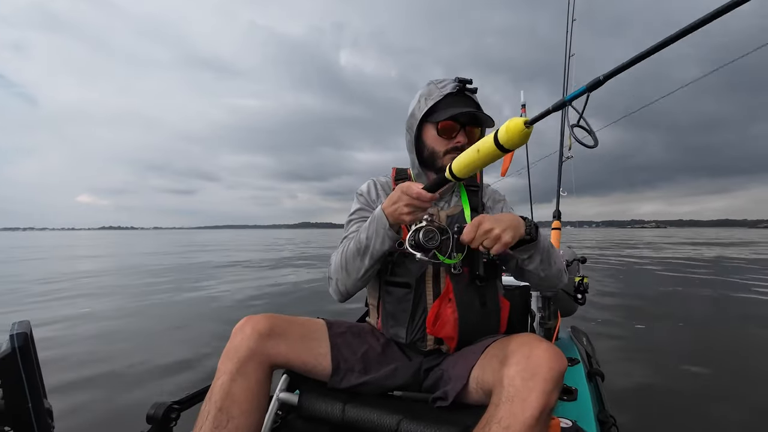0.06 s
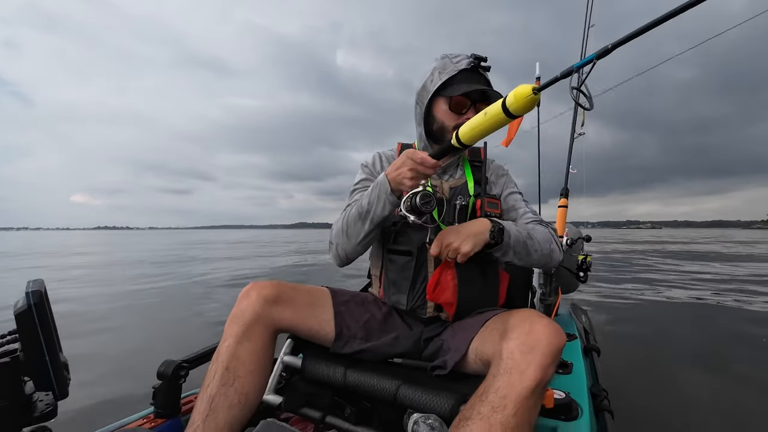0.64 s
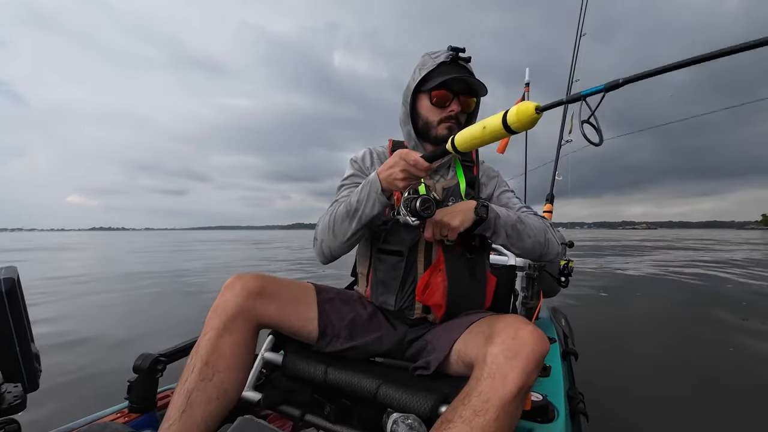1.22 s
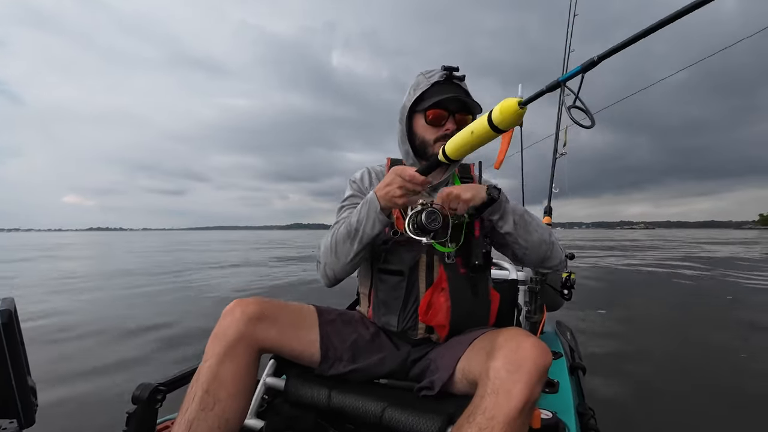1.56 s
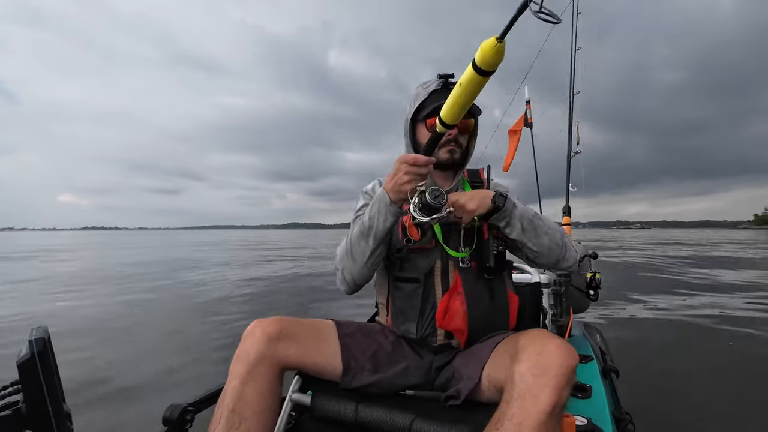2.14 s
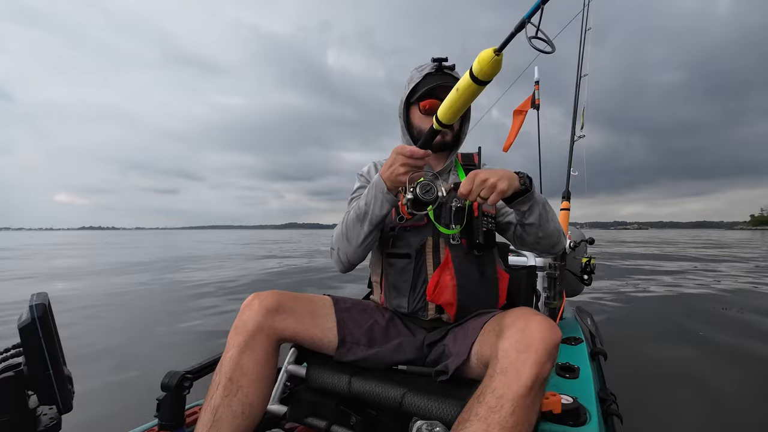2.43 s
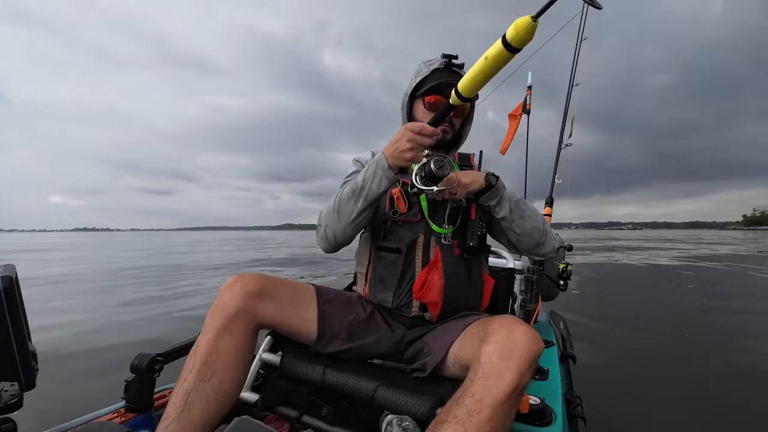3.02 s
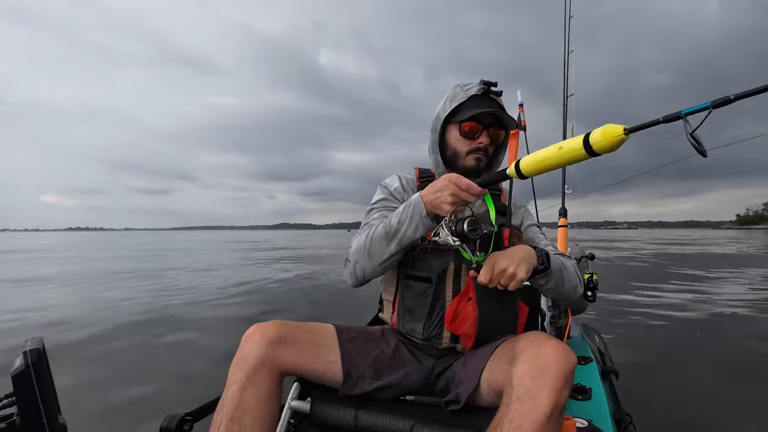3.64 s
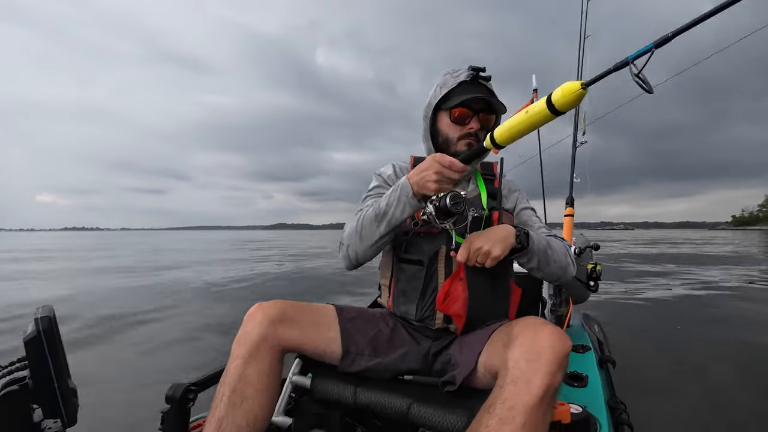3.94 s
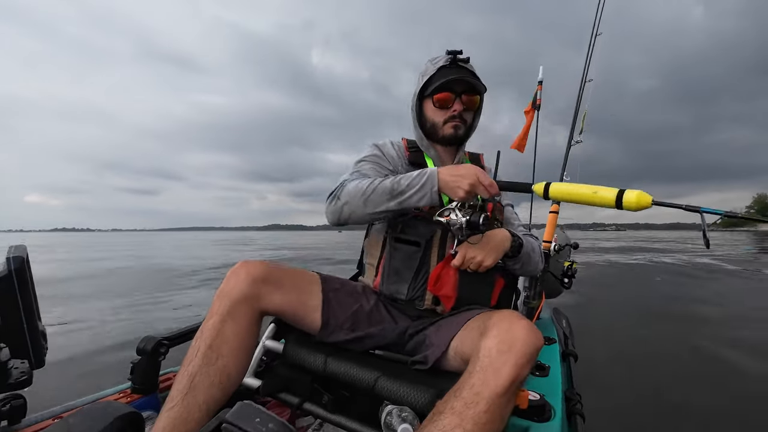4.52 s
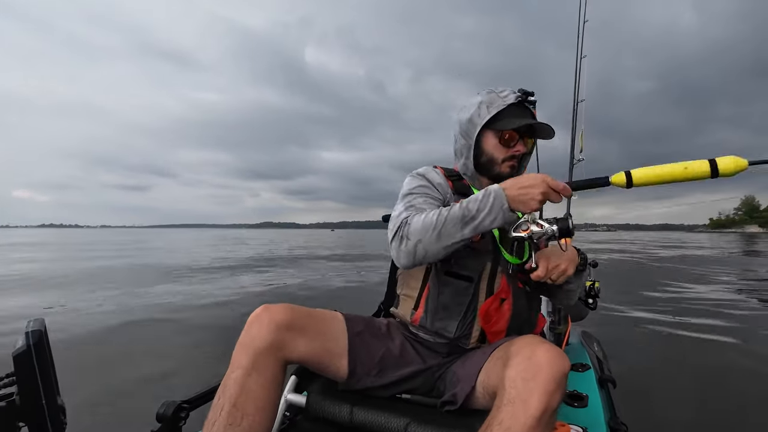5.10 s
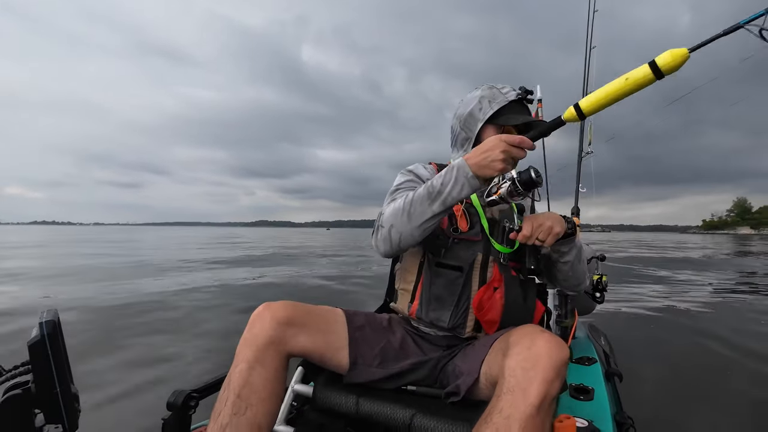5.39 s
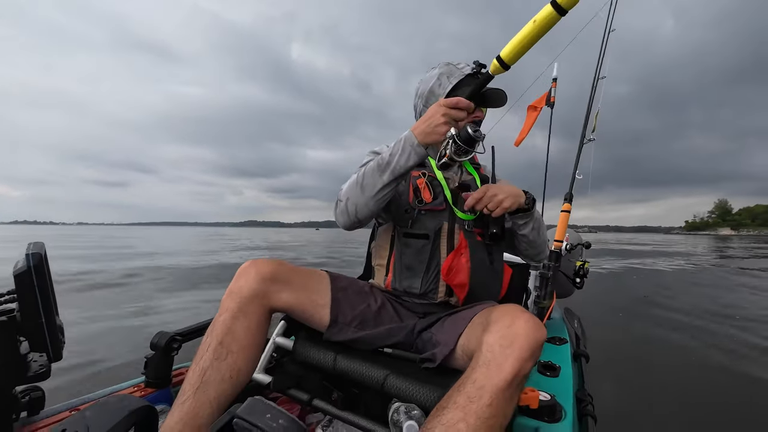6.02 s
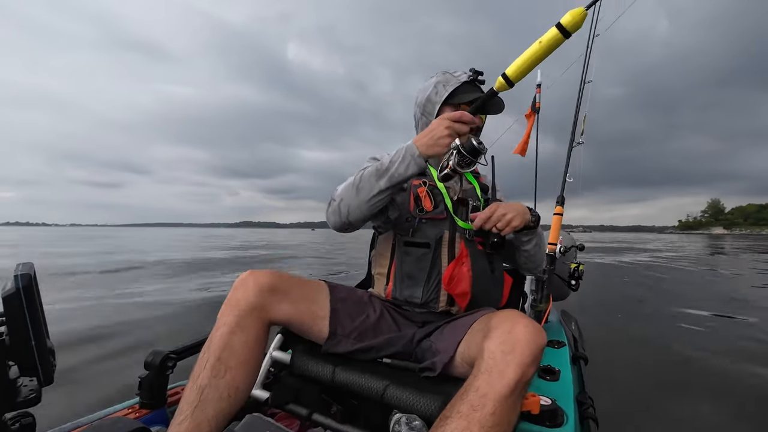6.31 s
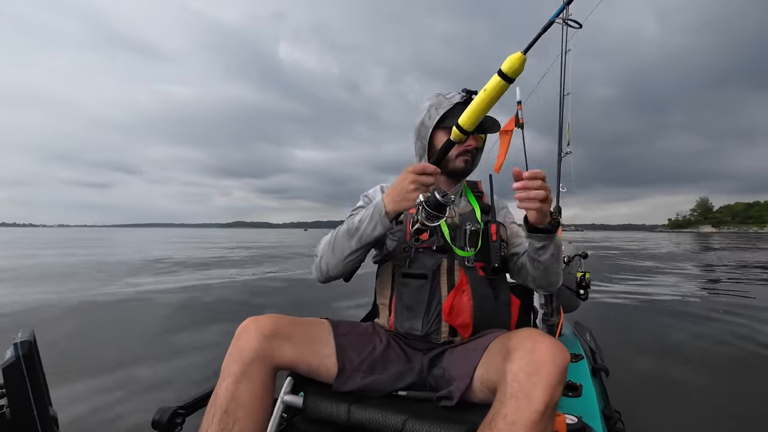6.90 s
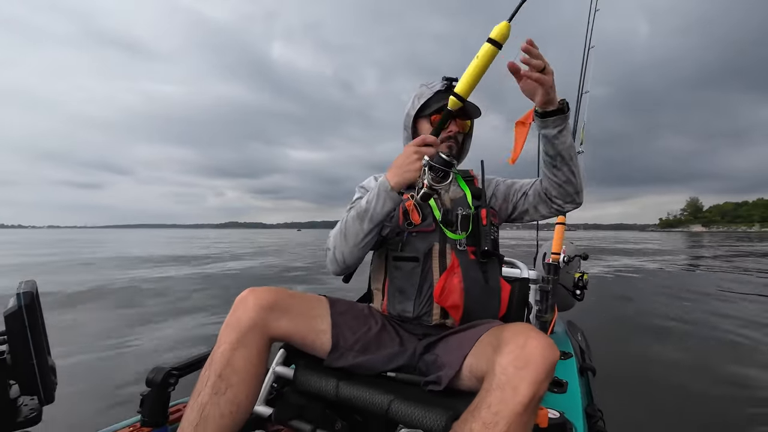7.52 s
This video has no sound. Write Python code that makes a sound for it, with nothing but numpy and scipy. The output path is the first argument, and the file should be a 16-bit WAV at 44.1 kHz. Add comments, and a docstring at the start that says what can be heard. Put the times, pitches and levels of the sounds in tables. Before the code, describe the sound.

A fishing reel whirs and ticks in short spurts, then a fish splashes at the surface, with wind rumbling on the microphone.

```python
"""Reeling in a fish from a kayak

A spinning reel is cranked in short spurts: meshing gears whine up and down, the rotor rasps, bail and
line tick. The hooked fish thrashes at the surface in two bouts of slaps, bubbles and spray; the tackle
clacks. Wind buffets the microphone over a wash of open water, hull slop, a low hum and faint birds."""
import sys
import numpy as np
from scipy import signal
from scipy.fft import rfft, irfft, next_fast_len
from scipy.io import wavfile
from scipy.ndimage import uniform_filter1d

SR = 44100
rng = np.random.default_rng(int(sys.argv[2]) if len(sys.argv) > 2 else 0)


def int16_out(signal):
    """Quantize to a 16-bit WAV file."""
    q = np.round(np.clip(np.atleast_2d(signal).T, -1, 1) * 32767)
    wavfile.write(sys.argv[1], SR, q.astype(np.int16))


N = 341762
T = np.arange(N) / SR

# impact spectrum, water slaps and tackle clack: f/Hz, gain/dB
IMPACT_EQ = [(500, -22), (900, -8), (1400, 9), (2000, 4.5), (3200, 8.5), (4500, 3.5), (7000, 0),
             (16000, -18)]
# bright spectrum, spray and tackle clack: f/Hz, gain/dB
MIST_EQ = [(2000, -2), (4500, -4.5), (7000, -5.5), (9000, -6.5), (11000, 1.5), (16000, -11)]


def amp(db):
    """dB to gain."""
    return 10 ** (np.asarray(db) / 20)


def unit(x):
    """Scale to rms 1."""
    return x / np.sqrt(np.mean(x ** 2) + 1e-20)


def curve(rows):
    """Breakpoints (t/s, value) to a per-sample curve."""
    return np.interp(T, *np.transpose(rows))


def eq_db(eq, hz):
    """Gain of a spectrum at hz, interpolated over log frequency."""
    f, db = np.transpose(eq)
    return np.interp(np.log(hz + 1), np.log(f + 1), db)


def colour(x, eq):
    """Filter by a spectrum; rms 1."""
    size = next_fast_len(len(x))
    gain = amp(eq_db(eq, np.fft.rfftfreq(size, 1 / SR)))
    return unit(irfft(rfft(x, size) * gain, size)[:len(x)])


def noise(size=N):
    """White noise."""
    return rng.standard_normal(size)


def wander(hz):
    """Random drift, low-passed at hz; rms 1."""
    slow = signal.sosfilt(signal.butter(2, hz, fs=SR / 10, output="sos"), noise(N // 10 + 1))
    return unit(np.interp(T, T[::10], slow[:len(T[::10])]))


def ring(x, hz, width_hz):
    """Resonator, peak gain 1."""
    return signal.lfilter(*signal.iirpeak(hz, hz / width_hz, SR), x)


def add(mix, at_s, sound):
    """Mix a sound in at at_s."""
    part = mix[max(round(at_s * SR), 0):][:len(sound)]
    part += sound[:len(part)]


def burst(eq, t60_s, rise_s=0.00028):
    """Coloured noise, fast rise, exponential decay; peak 1."""
    t = T[:SR // 5]
    puff = colour(noise(len(t)), eq) * (1 - np.exp(-t / rise_s)) * amp(-60 * t / t60_s)
    return puff / abs(puff).max()


def grains(per_s, spread_db):
    """Sparse clicks of uneven size."""
    when, tail, polarity = rng.random((int(per_s * N / SR), 3)).T
    size = amp(spread_db * np.minimum(-np.log(tail), 4)) * (2 * polarity - 1)
    return np.bincount((when * N).astype(int), size, N)


def birds():
    """Thin gliding whistles from the shore."""
    # whistles: t/s, length/s, start f/Hz, end f/Hz, level/dB
    whistles = [(.37, 0.17, 5300, 5050, -76), (1.09, .13, 6400, 6850, -80), (6.845, 0.18, 6400, 6550, -79),
                (7.002, 0.2, 4200, 4300, -76)]
    out = np.zeros(N)
    for at_s, length_s, from_hz, to_hz, db in whistles:
        hz = np.linspace(from_hz, to_hz, int(length_s * SR))
        add(out, at_s, amp(db) * np.hanning(len(hz)) * np.sin(2 * np.pi * np.cumsum(hz) / SR))
    return out


def lake():
    """Open-water wash, a low hum, and a faint steady hiss that swells briefly near 5 s."""
    # wash envelope: t/s, level/dB
    wash_levels = [(0, -61), (.5, -59.5), (1.1, -60), (3.05, -61), (4.1, -60.5), (4.6, -60.5), (5.2, -60),
                   (6.6, -61), (7.75, -58.5)]
    # wash spectrum: f/Hz, gain/dB
    wash_eq = [(180, -19), (300, -4), (354, -3.5), (689, -11.5), (900, -18), (1060, -18.5), (2790, -42.5),
               (3460, -41.5), (3830, -61), (5340, -36), (16000, -71)]
    # hum tones: f/Hz, width/Hz, level/dB
    hum_tones = [(243.9, 6.9, -55.5), (212.5, 11.8, -57)]
    # background hiss envelope, end values held: t/s, level/dB
    hiss_levels = [(4.3, -65.5), (4.55, -63.5), (4.78, -63), (4.93, -57.5), (5.03, -58), (5.1, -65.5),
                   (5.2, -66)]
    # hiss spectrum: f/Hz, gain/dB
    hiss_eq = [(600, 3.5), (1400, 1), (2800, -5.5), (4500, -11.5), (7000, -14.5), (11000, -19),
               (16000, -27)]
    wash = amp(curve(wash_levels) + 0.7 * wander(15)) * colour(noise(), wash_eq)
    hum = np.zeros(N)
    for hz, width_hz, db in hum_tones:
        peak = np.sqrt(2) * amp(db + 2 * wander(width_hz))
        drifting_hz = hz + width_hz / 2 * wander(width_hz)
        hum += peak * np.sin(2 * np.pi * np.cumsum(drifting_hz) / SR)
    hiss = amp(curve(hiss_levels)) * colour(noise() + 0.45 * unit(grains(300, 3.1)), hiss_eq)
    return wash + hum + hiss


def hull():
    """Wavelets slop against the kayak."""
    # slops: t/s, peak/dB, t60/s
    slops = [(.665, -42, 0.053), (.776, -39, 0.03), (.864, -40, 0.11), (0.896, -42, .08),
             (3.83, -43.5, 0.21), (4.738, -32, 0.045), (6.06, -52, 0.054), (7.677, -37, 0.04)]
    # slop spectrum: f/Hz, gain/dB
    slop_eq = [(20, -46), (150, -6), (300, 1.5), (430, 10.5), (600, -16), (1200, -33), (2500, -29),
               (16000, -88)]
    out = np.zeros(N)
    for at_s, db, t60_s in slops:
        add(out, at_s, amp(db) * burst(slop_eq, t60_s, rise_s=0.00061))
    return out


def eddies(eq, span_s):
    """Turbulence, levelled over span_s so that the gusts shape its swells."""
    x = colour(noise(), eq)
    return x / np.sqrt(uniform_filter1d(x ** 2, int(span_s * SR)) + 0.11)


def wind(rumble_db=0.75, thump_db=-1, flutter_db=-46, breeze_db=-35, flutter_db_per_db=0.29):
    """Wind on the microphone: rumble and flutter follow its strength; buffets and thumps stand out."""
    # wind strength: t/s, level/dB
    strength = [(0.0, -32.5), (0.2, -40), (0.8, -41), (0.9, -32), (1.3, -33.5), (1.5, -39), (1.6, -33.0),
                (1.7, -39.5), (2.0, -39.5), (2.45, -30), (2.55, -41.5), (2.65, -28.0), (3.55, -44),
                (4.15, -39.0), (4.5, -27.5), (5.3, -37.0), (5.7, -30.5), (5.85, -44), (5.95, -29),
                (6.4, -28.0), (6.7, -35.5), (6.8, -30), (7.45, -23.5), (7.75, -32)]
    # rumble spectrum: f/Hz, gain/dB
    rumble_eq = [(8, -19.5), (22, 3), (40, 0.5), (65, -2.5), (90, -7.5), (120, -17), (200, -42),
                 (2000, -140)]
    # flutter spectrum: f/Hz, gain/dB
    flutter_eq = [(50, -8.5), (85, -2.5), (115, 4), (160, -6), (210, -10), (300, -19.5), (450, -38.5),
                  (800, -45.5), (8000, -130)]
    # buffets: t/s, length/s, level/dB
    buffets = [(0.915, .1, -39), (2.336, 0.063, -31.5), (2.978, .06, -38), (4.54, 0.059, -34),
               (4.76, 0.059, -25.5), (4.954, 0.11, -36), (5.7, .1, -38), (5.973, .08, -32),
               (6.09, 0.059, -27), (6.215, 0.15, -28.5), (6.386, 0.19, -29), (6.522, 0.039, -34),
               (6.81, 0.15, -37), (7.177, 0.11, -32), (7.263, 0.071, -29), (7.389, .17, -30)]
    # dull thumps: t/s, level/dB, f/Hz, length/s
    thumps = [(2.688, -23.5, 148, 0.017), (4.735, -25, 327.9, 0.01), (4.745, -11.5, 92, 0.028),
              (4.763, -15.5, 147, 0.022), (6.198, -14.5, 132, 0.0206), (6.365, -16, 104.6, 0.041)]
    strength_db = curve(strength)
    flutter_gain = amp(flutter_db + flutter_db_per_db * (strength_db - breeze_db) + 2 * wander(10))
    for at_s, length_s, db in buffets:
        buffet = amp(db) * np.exp(-(2 * (T - at_s) / length_s) ** 2)
        flutter_gain = np.maximum(flutter_gain, buffet)
    rumble_gain = amp(strength_db + rumble_db + 0.9 * wander(6))
    out = rumble_gain * eddies(rumble_eq, 0.114) + flutter_gain * eddies(flutter_eq, 0.099)
    for at_s, db, hz, length_s in thumps:
        t = T[:int(length_s * SR)]
        window = np.sin(np.pi * t / length_s) ** 2
        add(out, at_s, -amp(db + thump_db) * np.sin(2 * np.pi * hz * t) * window)
    return out


def tackle(ring_db=10, clack_s=7.52, clack_db=-26, crack_db=-2):
    """Bright ticks of bail and line; one hard clack of damped modes and noise."""
    # ticks: t/s, peak/dB, resonance f/Hz
    ticks = [(0.3186, -34.5, 15300), (0.6719, -44, 6170), (1.679, -45.5, 6090), (1.9624, -36, 6130),
             (2.0029, -38, 6980), (2.0663, -47, 8160), (2.1728, -37, 6100), (2.2458, -44.5, 6020),
             (2.7044, -51, 8160), (2.7396, -41, 6020), (2.9634, -36.5, 9560), (3.3767, -46, 6200),
             (3.6376, -45.5, 9660), (3.7868, -53, 7540), (4.2704, -48, 7500), (4.599, -49, 6950),
             (5.5613, -49, 7490), (5.6335, -43.5, 7570), (5.829, -44, 9150), (6.643, -45, 6030),
             (6.6993, -42.5, 9500)]
    # tick spectrum: f/Hz, gain/dB
    tick_eq = [(1000, -22), (3000, -10), (5500, -3.5), (8500, -10.5), (11500, -1.5), (13500, -6),
               (15200, -5), (17000, 0)]
    # clack modes: f/Hz, gain/dB, t60/s
    clack_modes = [(1140, -9, 0.013), (1550, -11, 0.031), (2870, -0.5, 0.013), (3300, -0.5, 0.012),
                   (3500, 4.5, 0.015), (3770, -6, 0.014), (5500, -11, 0.013), (6130, -9, 0.032),
                   (8400, -25, .02)]
    out, t = np.zeros(N), T[:SR // 10]
    for at_s, db, hz in ticks:
        tick = burst(tick_eq, t60_s=0.026, rise_s=0.0001)
        tick += amp(ring_db) * ring(tick, hz, width_hz=1500)
        add(out, at_s, amp(db) * tick / abs(tick).max())
    modes = sum(amp(db - 60 * t / t60_s) * np.sin(2 * np.pi * (hz * t + rng.random()))
                for hz, db, t60_s in clack_modes)
    crack = burst(IMPACT_EQ, t60_s=0.011) + 0.93 * burst(MIST_EQ, t60_s=0.044)
    add(out, clack_s, amp(clack_db) * modes)
    add(out, clack_s, amp(clack_db + crack_db) * crack)
    return out


def bubble(hz, cycles, glide=0.018):
    """A trapped bubble rings, rising in pitch near the surface; decays to 1/e in `cycles`."""
    age = T[:SR // 25] * hz / cycles
    phase = 2 * np.pi * cycles * age * (1 + glide * age / 2)
    return np.sin(phase) * np.exp(-age) * (1 - np.exp(-10 * age))


def bubbling(lo_hz, hi_hz, per_s, spread_db, cycles):
    """Bubble cloud: 20 sizes, per_s of each; rms 1."""
    return unit(sum(signal.oaconvolve(grains(per_s, spread_db), bubble(hz, cycles))[:N]
                    for hz in np.geomspace(lo_hz, hi_hz, num=20)))


def churn(rise_s=0.024, t60_s=0.31, patter_db=-16, patter_t60_s=8):
    """Churned water gurgles and fizzes; each surge swells, holds, collapses to a patter of spray."""
    # surges: t/s, hold/s, gurgle level/dB, fizz level/dB
    surges = [(5.913, 0.12, -48.5, -52.5), (6.193, .06, -51, -54), (6.358, 0.062, -61.5, -61.5),
              (7.241, 0.018, -50.5, -48.5), (7.321, 0.34, -59.5, -57), (7.72, .04, -54, -58.5)]
    gurgle = amp(-2) * bubbling(852, 4400, per_s=60, spread_db=3.2, cycles=3.6)
    fizz = amp(-2) * bubbling(4500, 15800, per_s=70, spread_db=4.1, cycles=6.7)
    crackle = amp(-5) * colour(grains(1500, 2.9), MIST_EQ)
    gurgle_gain, fizz_gain = np.zeros((2, N))
    for at_s, hold_s, gurgle_db, fizz_db in surges:
        swell = np.exp(np.minimum(T - at_s, 0) / rise_s)
        after_s = np.maximum(T - at_s - hold_s, 0)
        decay_db = np.maximum(-60 * after_s / t60_s, patter_db - 60 * after_s / patter_t60_s)
        gurgle_gain = np.maximum(gurgle_gain, swell * amp(gurgle_db + decay_db))
        fizz_gain = np.maximum(fizz_gain, swell * amp(fizz_db + decay_db))
    return gurgle_gain * gurgle + fizz_gain * (fizz + crackle)


def fish(slap_db=-10, hollow_db=-2, mist_db=-2, sheet_db=-4, drop_db=-1):
    """Tail slaps drive air under, with a hollow thud and fine mist; single drops trap bubbles."""
    # slaps: t/s, level/dB, t60/s, relative hollow level/dB, relative mist level/dB
    slaps = [(5.9346, -34.5, 0.15, -15, -17), (5.959, -34, 0.14, -27, -1), (6.0235, -37, 0.057, -12, -21),
             (6.12, -40, 0.093, -9, -7), (6.142, -32.5, 0.05, -20, -6), (6.1937, -35, 0.065, -16, -19),
             (6.2114, -29.5, 0.085, -22, -16), (6.225, -20, 0.034, -5, -14), (6.2444, -46, 0.052, -16, -18),
             (6.3676, -35, 0.056, -28, -5), (6.388, -29, 0.029, -28.5, -22), (6.4259, -28, 0.035, -16, -30),
             (7.2234, -33.5, 0.03, -10, 7), (7.248, -31, 0.038, 0.5, -9), (7.356, -29.5, 0.054, -2, -6),
             (7.3623, -25, 0.065, 4.5, -10), (7.379, -29, 0.06, -11, -17), (7.443, -37, 0.045, -5, 0),
             (7.495, -30.5, 0.051, -27, -20)]
    # hollow thud spectrum: f/Hz, gain/dB
    hollow_eq = [(20, -50), (150, -27), (400, -4.5), (650, -1), (1200, -12), (2500, -26), (16000, -80)]
    # drops: t/s, level/dB, bubble f/Hz
    drops = [(5.745, -43, 2107), (5.815, -42.5, 5270), (5.866, -46, 1550), (5.885, -42, 2270),
             (5.945, -34.5, 1140), (5.965, -35, 1950), (6.025, -34.5, 1310), (6.061, -41, 4270),
             (6.246, -33.5, 3720), (6.262, -36.5, 1510), (6.343, -44, 2740), (6.39, -40, 1700),
             (6.426, -34.5, 3140), (6.558, -53.5, 3030), (6.587, -51, 2450), (6.6, -50, 1230),
             (6.703, -46.5, 2390), (6.798, -47.5, 3130), (6.97, -51, 2000), (6.985, -47, 1530),
             (7.204, -32.5, 1355), (7.291, -42, 3850), (7.302, -39, 2470), (7.336, -42, 3300),
             (7.461, -38.5, 2470), (7.565, -42, 1790), (7.611, -35.5, 6050), (7.632, -40, 7000)]
    out, blows, t = np.zeros(N), np.zeros(N), T[:SR // 5]
    for at_s, db, t60_s, low_db, high_db in slaps:
        add(blows, at_s, amp(db + slap_db - 60 * t / t60_s) * (1 - np.exp(-t / 0.0021)))
        add(out, at_s, amp(db + low_db + hollow_db) * burst(hollow_eq, t60_s=0.042, rise_s=0.0011))
        add(out, at_s, amp(db + high_db + mist_db) * burst(MIST_EQ, t60_s, rise_s=0.00042))
    trapped_air = colour(bubbling(790, 8930, per_s=200, spread_db=1.2, cycles=2.7), IMPACT_EQ)
    water_sheet = amp(sheet_db) * colour(noise(), IMPACT_EQ)
    out += blows * (trapped_air + water_sheet)
    for at_s, db, hz in drops:
        add(out, at_s, amp(db + drop_db) * bubble(hz, cycles=6.2))
    return out


def crank(stall_hz=60, running_hz=359.6, coast_s=0.045):
    """Each push speeds up and runs down; the fastest sets the mesh rate, loudness follows speed."""
    # pushes: peak t/s, rise/s, fall/s, top mesh f/Hz, gear level/dB, rasp level/dB, spool share/0-1
    pushes = [(0.018, 0.059, 0.097, 981.0, -59.5, -65.5, 0.08), (0.114, 0.14, 0.23, 932.0, -59.5, -64, 0.2),
              (0.203, 0.046, 0.073, 878, -57, -61.5, 0.08), (0.315, 0.101, 0.028, 714, -57, -64, 0.14),
              (0.755, 0.089, 0.063, 1478, -51.0, -56, 0.06), (1.484, 0.082, 0.063, 849, -54, -58.5, 0.57),
              (1.665, 0.15, 0.14, 617, -57, -68, 0.12), (1.823, 0.108, 0.085, 1730, -50.5, -56.5, 0.23),
              (1.948, 0.08, 0.08, 1470, -51.5, -57, 0.05), (2.013, 0.07, 0.075, 1730, -53.5, -56, 0.07),
              (2.07, 0.07, 0.14, 1380, -52, -56, 0.07), (2.151, 0.146, 0.107, 1157.0, -50.5, -56.5, 0.16),
              (2.245, 0.082, 0.09, 552.0, -55, -66.5, 0.15),
              (2.509, 0.097, 0.096, 2007.0, -48.5, -53.0, 0.03),
              (2.705, 0.096, 0.11, 1714, -53.5, -55.5, 0.16),
              (2.946, 0.15, 0.062, 610.4, -54.0, -64.5, 0.28), (3.282, 0.19, 0.099, 728.0, -53, -66, 0.38),
              (3.375, 0.16, 0.297, 902.0, -54, -64.5, 0.38),
              (3.582, 0.126, 0.085, 1429.0, -48, -58.0, 0.29),
              (3.829, 0.054, 0.098, 558.0, -57.5, -67, 0.15), (5.652, 0.12, 0.061, 947.0, -51.0, -62, 0.09)]
    mesh_hz, gear_gain, rasp_gain, share_sum, speed_sum = np.zeros((5, N))
    for at_s, rise_s, fall_s, top_hz, gear_db, rasp_db, share in pushes:
        from_peak = abs(T - at_s) / np.where(T < at_s, rise_s, fall_s)
        speed = np.exp(-np.minimum(from_peak ** 2.5, 30))  # flat-topped bell
        mesh_hz = np.maximum(mesh_hz, top_hz * speed)
        gear_gain = np.maximum(gear_gain, amp(gear_db) * speed ** 0.79)
        rasp_gain = np.maximum(rasp_gain, amp(rasp_db) * speed)
        share_sum += share * speed
        speed_sum += speed
    running = np.clip((mesh_hz - stall_hz) / (running_hz - stall_hz), 0, 1) ** 2
    rasp_gain = uniform_filter1d(running * rasp_gain, int(coast_s * SR))  # rotor inertia
    return np.maximum(mesh_hz, running_hz), running * gear_gain, rasp_gain, share_sum / speed_sum


def mesh_tones(teeth, mesh_hz, body_eq, even_db, count, db_per_octave=-3, waver_db=4.3, waver_hz=60):
    """Wavering tooth-rate harmonics, even ones favoured, flaring at body resonances; rms about 1."""
    tones, power = np.zeros((2, N))
    for k in range(1, count + 1):
        db = db_per_octave * np.log2(k) + even_db * (k % 2 == 0) + eq_db(body_eq, k * mesh_hz)
        gain = amp(db) * (k * mesh_hz < SR / 2)
        tone = np.cos(2 * np.pi * (k * teeth + rng.random()))
        tones += gain * tone * unit(amp(waver_db * wander(waver_hz)))
        power += gain ** 2 / 2
    return tones / np.sqrt(power + 1e-12)


def reel(gear_db=0.2, rasp_db=0.1, teeth_per_turn=8, grit=0.62, uneven_db=1):
    """Gears sing through the housing, rattling when slow; bearings and line rasp through the spool."""
    # housing response to the low mesh tones: f/Hz, gain/dB
    housing_eq = [(300, -2), (550, 2), (750, -2), (880, -2), (1020, -1), (1220, 8.5), (1420, 4), (1620, -5),
                  (1820, -2.5), (2100, -3.5), (2400, -14), (2700, -29), (3100, -11), (5000, -52)]
    # rotor response to the high mesh tones: f/Hz, gain/dB
    rotor_eq = [(1900, -35), (2250, 4), (2650, 3), (3050, 5), (3600, 0), (4200, 4), (5000, 0), (5600, 0.5),
                (6500, -2.5), (8000, -1), (8800, -5), (11300, -3), (16000, -13)]
    # low rotor modes: f/Hz, width/Hz, gain/dB
    rotor_modes = [(515, 93, 0), (825, 150, -8), (1188, 150, 3), (1384, 23, 11.5), (1840, 53, 1),
                   (2170, 106, -18)]
    # high spool and bail modes: f/Hz, width/Hz, gain/dB
    spool_modes = [(4320, 37, -3), (5050, 77, 1.5), (5510, 90, 8.5), (5980, 67, 3), (7130, 130, -7.5),
                   (9600, 360, -6)]
    # rasp spectrum: f/Hz, gain/dB
    rasp_eq = [(1290, -72), (2200, -3), (3140, 4.5), (3500, -2.5), (4170, 6), (5390, -2.5), (6640, -2.5),
               (7970, 2), (8730, -17), (11400, -5), (13700, -19), (16000, -10)]
    # tonal share of the power: mesh f/Hz, gear share/0-1, rasp share/0-1
    tonal_shares = [(400, .5, .05), (750, .76, .22), (1400, .9, .62)]
    mesh_hz, gear_gain, rasp_gain, spool_share = crank()
    teeth = np.cumsum(mesh_hz * (1 + 0.027 * wander(120))) / SR
    runout = np.sin(2 * np.pi * teeth / teeth_per_turn)  # off-centre pinion gives sidebands
    teeth += 0.02 * runout
    throb = 1 + 0.55 * runout
    whine = unit(throb * mesh_tones(teeth, mesh_hz, housing_eq, even_db=1.5, count=5))
    overtones = unit(throb * mesh_tones(teeth, mesh_hz, rotor_eq, even_db=5, count=10))

    scrape = unit(noise() * (1 + 0.68 * np.cos(2 * np.pi * teeth))) + grit * unit(grains(900, 2))
    rattle = unit(sum(amp(db) * ring(scrape, hz, width_hz) for hz, width_hz, db in rotor_modes))
    spool = unit(sum(amp(db) * ring(scrape, hz, width_hz) for hz, width_hz, db in spool_modes))

    at_hz, gear_shares, rasp_shares = np.transpose(tonal_shares)
    gear_tonal = np.interp(mesh_hz, at_hz, gear_shares)
    rasp_tonal = np.interp(mesh_hz, at_hz, rasp_shares)
    spool_share = np.clip(spool_share, 0, 0.95 - rasp_tonal)
    gears = np.sqrt(gear_tonal) * whine + np.sqrt(1 - gear_tonal) * rattle
    rasp = np.sqrt(rasp_tonal) * overtones + np.sqrt(spool_share) * spool
    rasp += np.sqrt(1 - rasp_tonal - spool_share) * colour(scrape, rasp_eq)
    hand_load = unit(amp(uneven_db * wander(28)))
    return hand_load * (amp(gear_db) * gear_gain * gears + amp(rasp_db) * rasp_gain * rasp)


def scene():
    """All sources at one microphone, open air."""
    return (reel() + tackle() + fish() + churn() + hull() + wind() + lake() + birds())[None]


def record(dry):
    """Low-pass band limit."""
    lowpass = signal.firwin(511, cutoff=15950, window=("kaiser", 9), fs=SR)
    return signal.oaconvolve(dry, lowpass[None], "same")


dry = scene()
out = record(dry)
int16_out(out)
```